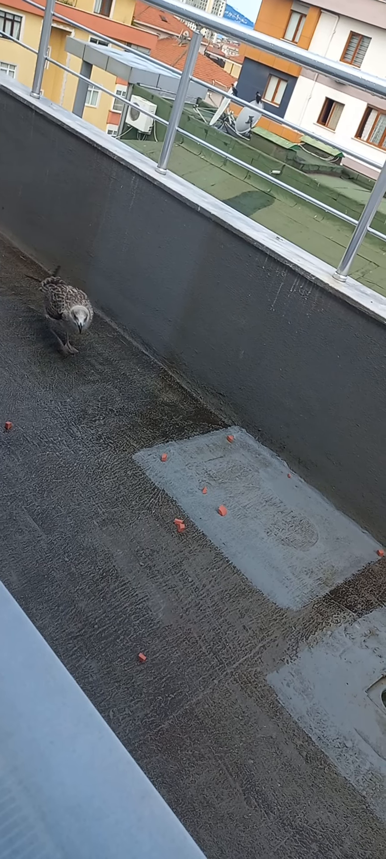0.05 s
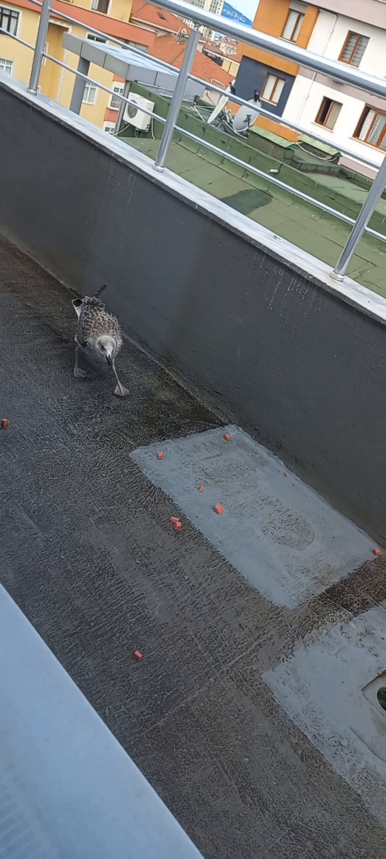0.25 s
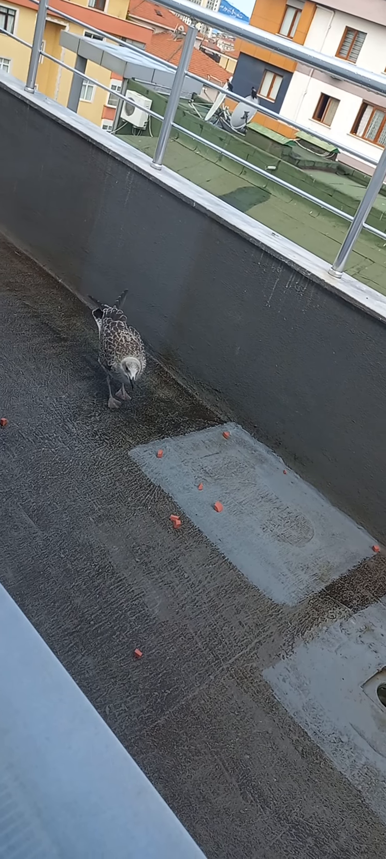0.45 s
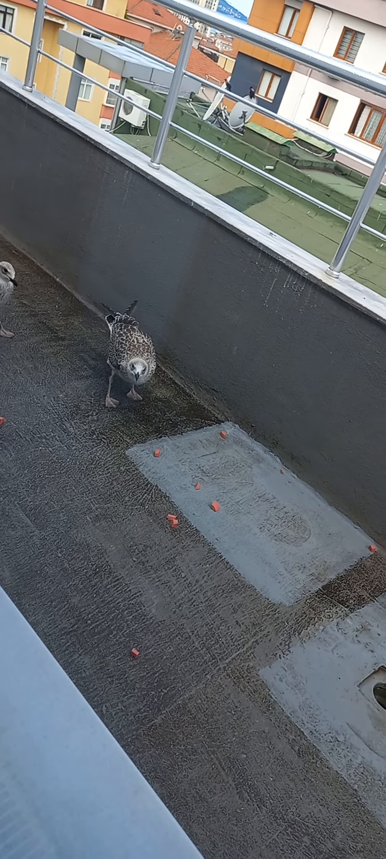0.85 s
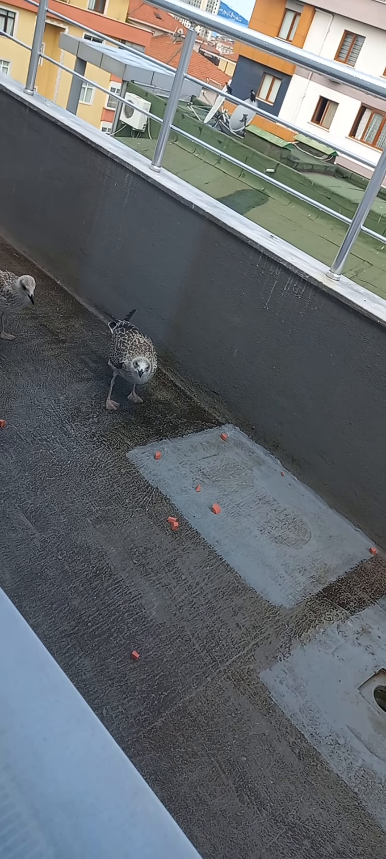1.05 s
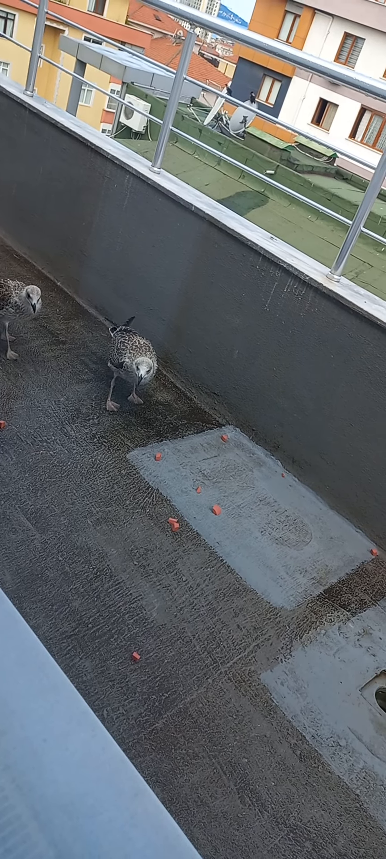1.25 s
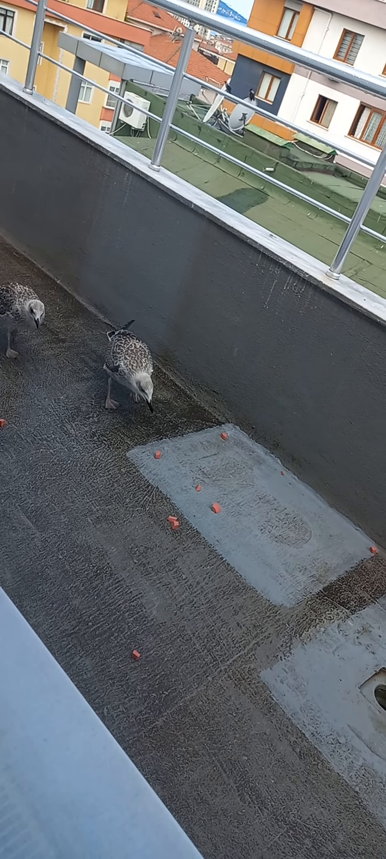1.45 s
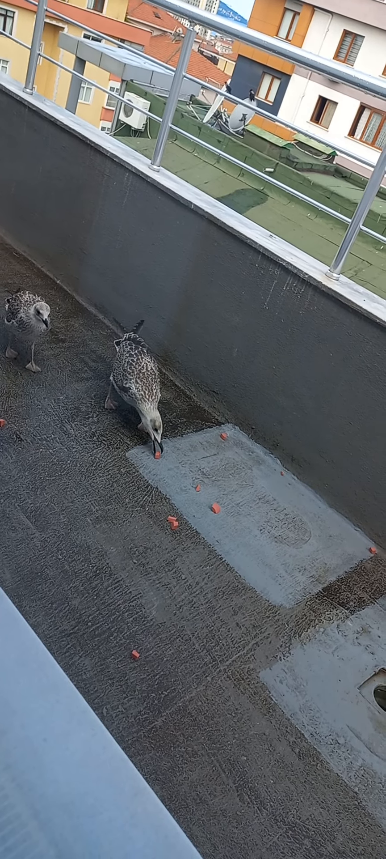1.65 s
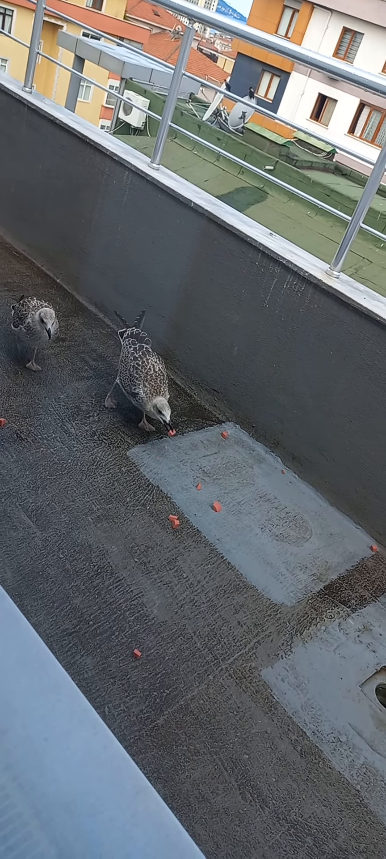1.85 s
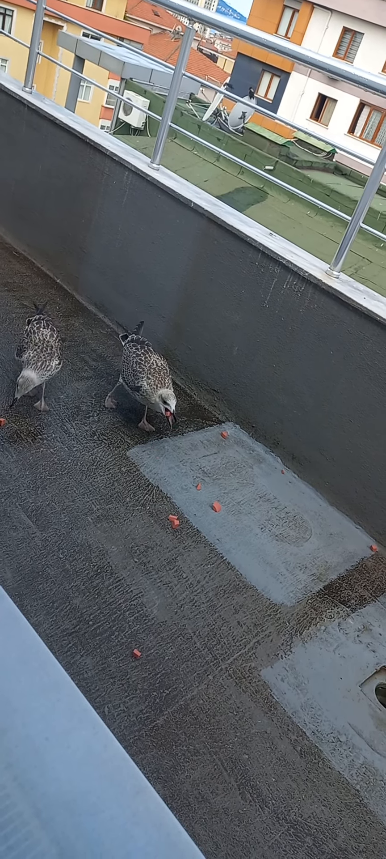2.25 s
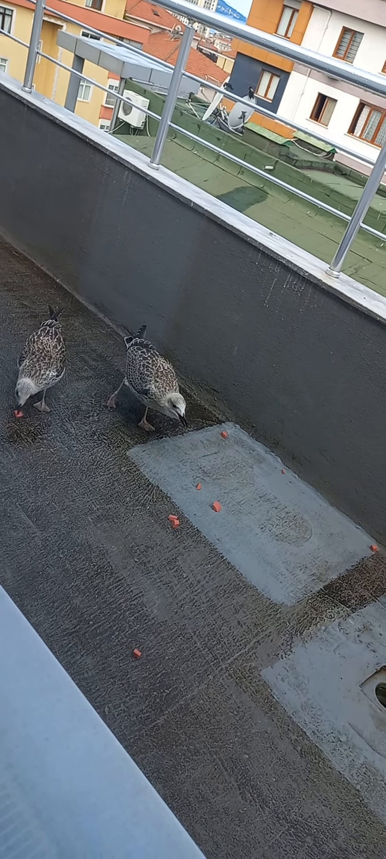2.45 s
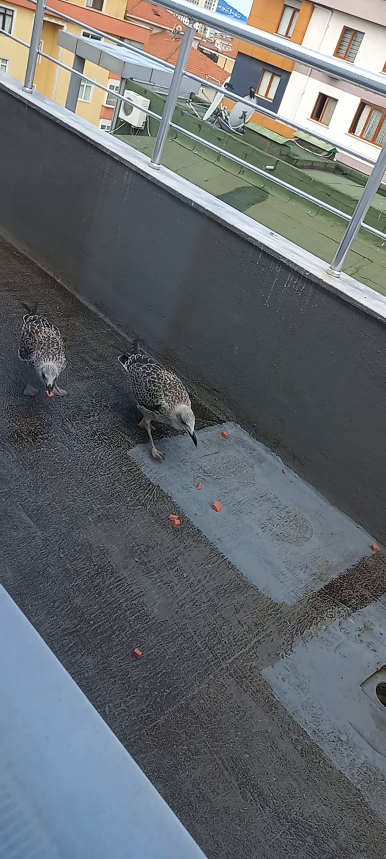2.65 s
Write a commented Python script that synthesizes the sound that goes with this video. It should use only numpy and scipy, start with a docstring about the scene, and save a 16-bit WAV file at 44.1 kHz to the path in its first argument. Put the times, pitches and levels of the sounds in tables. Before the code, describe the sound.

Young gulls beg with thin, high whistles that hold, then fall and roughen, each edged by short hoarse squeaks. The first comes at about 0.2 seconds, two overlap from 1.1 to 1.5, and another starts near 2 seconds, breaking into squeaks until 2.5. The terrace walls add a short echo. Light scuffs and soft rustling sound close by, over low wind rumble and faint town hiss.

```python
"""Two young gulls beg on a walled roof terrace: three bouts of thin whistles that hold, then fall,
each led in or broken off by short hoarse squeaks; the later calls overlap. Each note is a syrinx tone
with three overtones, roughened by jitter, shimmer and rasp. Floor and walls echo the calls.
Light scuffs and a soft rustle sound close by; behind are low wind, town hiss and a faint far squeal."""
import sys
import numpy as np
from scipy import signal
from scipy.fft import rfft, irfft, next_fast_len
from scipy.io import wavfile
from scipy.ndimage import map_coordinates

SR = 44100
rng = np.random.default_rng(int(sys.argv[2]) if len(sys.argv) > 2 else 0)


def file_out(sig):
    """Save sig as 16-bit WAV at sys.argv[1]."""
    # one column per channel
    cols = np.atleast_2d(sig).T
    # limit, then scale
    lim = np.clip(cols, -1, 1)
    pcm = np.round(lim * 32767).astype(np.int16)
    wavfile.write(sys.argv[1], SR, pcm)


N = 123479

# spectrum of scuffs and rustle: (frequency [Hz], level [dB])
GRIT_SPECTRUM = [(500, -16.5), (1400, 3), (2300, -0.5), (3500, -0.5), (6000, 0), (9000, -4.5), (12000, 1),
                 (15500, -4)]


def whistles(fall_roughness=0.94):
    """Long begging notes: cleanest at the top, rougher as the pitch falls."""
    # one whistle each: (time [s], pitch [Hz], level [dB])
    first = [(.195, 4070, -65.5), (.216, 4085, -34), (.26, 4092, -38.5), (.33, 4108, -30),
             (.365, 4105, -33.5), (.39, 4020, -37), (.42, 3933, -39.5), (.465, 3896, -49.5),
             (.482, 3818, -37.5), (.507, 3768, -38), (.525, 3754, -60)]
    second = [(1.152, 3830, -52), (1.168, 3854, -43), (1.19, 4012, -28), (1.215, 4008, -38.5),
              (1.265, 4087, -37.5), (1.29, 4108, -40.5), (1.34, 3992, -31.5), (1.39, 3940, -37.5),
              (1.44, 3860, -36.5), (1.49, 3690, -37.5), (1.515, 3643, -43), (1.53, 3600, -37)]
    second_upper = [(1.17, 4385, -63), (1.22, 4460, -52.5), (1.245, 4348, -37), (1.29, 4280, -32.5),
                    (1.34, 4246, -37.5), (1.39, 4160, -36.5), (1.44, 4102, -34.5), (1.48, 4050, -51)]
    third = [(2.062, 4530, -59), (2.072, 4588, -31.5), (2.11, 4548, -32), (2.142, 4534, -43.5),
             (2.154, 4512, -37.5), (2.195, 4560, -31), (2.23, 4520, -40.5), (2.255, 4426, -37),
             (2.28, 4385, -37), (2.305, 4150, -46.5), (2.32, 4100, -60)]
    # (curve, 2nd harmonic [dB], 3rd harmonic [dB], roughness [-], left-right [dB], left lag [s])
    notes = [(first, -20.5, -17, .016, -5, .0002293),
             (second, -23.5, -19, .02, -3.5, .00027),
             (second_upper, -26, -22, .02, -2.5, .00026),
             (third, -10.5, -14, .025, 0, .000245)]
    out = np.zeros((2, N))
    for curve, second_db, third_db, top_roughness, pan_db, lag_s in notes:
        hz, gain = contour(curve)
        roughness = top_roughness + fall_roughness * (1 - hz / hz.max())
        out += syrinx(hz, gain, second_db, third_db, roughness, pan_db, lag_s)
    return out


def squeaks(attack_s=0.013, release_s=0.014):
    """Short sliding notes where the voice catches or breaks."""
    # (onset [s], length [s], start pitch [Hz], end pitch [Hz], level [dB],
    #  2nd harmonic [dB], 3rd harmonic [dB], roughness [-])
    notes = [ (-.02, 0.049, 3806, 3696, -52.5, -17, -24, 0.41), (.125, .028, 3580, 3305, -49, 4, -2.5, .2),
             (0.155, 0.039, 3398, 3360, -49.5, -20, -17, 0.55),
             (.48, 0.04, 3600, 3435, -55.5, -21, -23, 0.73),
             (1.078, .045, 3405, 3158, -46.5, -14, -43, .35), (1.099, 0.024, 4180, 4005, -46, -6, -5, .25),
             (1.123, 0.049, 3306, 3254, -44, -20.5, -34, 0.47),
             (1.19, 0.069, 4590, 4780, -58.5, -11, -19.5, 1.1),
             (1.425, 0.08, 3642, 3485, -43.5, -20, -28, 0.06),
             (1.482, 0.038, 3447, 3251, -38.5, -13, -33, .25),
             (1.95, 0.0323, 3780, 3415, -45, -2.5, -5, 0.33),
             (1.973, 0.0427, 3568, 3243, -45.5, -12.5, -24, 0.58),
             (2.017, 0.073, 3960, 4028, -42, -25, -12, 0.13),
             (2.293, 0.06, 3300, 3260, -44, -11.5, -22.5, 0.33),
             (2.331, .05, 3700, 3607, -34, -10.5, -22.5, .2),
             (2.345, 0.047, 1725, 1900, -58, -20, -38, 0.17),
             (2.388, 0.051, 4160, 3920, -45, -8, -25, 0.24),
             (2.439, 0.043, 3950, 4180, -47.5, -2.5, -22, 0.4),
             (2.463, 0.031, 3427, 3320, -36.5, -20.5, -28, 0.37),
             (2.479, 0.03, 2416, 2258, -38.5, -19, -33, 0.35),
             (2.482, 0.0283, 1557, 1318, -49.5, -38, -28, 0.4)]
    t, out = clock(), np.zeros((2, N))
    for onset_s, length_s, start_hz, end_hz, db, second_db, third_db, roughness in notes:
        end_s = onset_s + length_s
        gate = np.clip((t - onset_s) / attack_s, 0, 1) * np.clip((end_s - t) / release_s, 0, 1)
        hz = np.interp(t, [onset_s, end_s], [start_hz, end_hz])
        out += syrinx(hz, amp(db) * gate, second_db, third_db, roughness, pan_db=-3, lag_s=0.0002755)
    return out


def syrinx(hz, gain, second_db, third_db, roughness, pan_db, lag_s):
    """Four-harmonic voice in stereo; roughness shakes pitch and level and adds a rasp."""
    on = np.flatnonzero(gain > 0)
    t, roughness = on / SR, np.broadcast_to(roughness, N)[on]
    waver = .0015 * wobble(t, rate_hz=70)
    jitter = roughness * .035 * wobble(t, rate_hz=600)
    hz = hz[on] * (1 + waver + jitter)
    phase = 2 * np.pi * (np.cumsum(hz) / SR - np.outer([lag_s, 0], hz))
    tone = 0
    for k, level in enumerate(amp([0, second_db, third_db, third_db - 8]), 1):
        rasp = 1 + roughness * 0.15 * wobble(t, rate_hz=1200)
        tone += level * np.sin(k * phase) * rasp
    shimmer_db = roughness * 8.5 * wobble(t, rate_hz=600)
    pan = amp([[pan_db / 2], [-pan_db / 2]])
    out = np.zeros((2, N))
    out[:, on] = np.sqrt(2) * tone * gain[on] * amp(shimmer_db) * pan
    return out


def throat(voice):
    """The throat colours the voice with two notches."""
    # (frequency [Hz], gain [dB])
    response = [(1300, -0.5), (2550, 0.5), (2850, -22), (3200, -0.5), (4800, -1.5), (5300, -15),
                (6500, 0.5), (15000, -4.5)]
    return filtered(voice, lambda hz: amp(along(response, hz)))


def terrace(x, tail_delay_s=.01, tail_db=-3.5):
    """Direct sound, floor and wall echoes, and a short diffuse tail."""
    # echoes: (left delay [s], right delay [s], left gain [dB], right gain [dB])
    walls = [(.0031, .0034, -7.5, -16), (0.0124, 0.0078, -10.5, -17), (0.0265, 0.015, -10.5, -5.5)]
    # tail decay: (frequency [Hz], T60 [s])
    tail_t60 = [(1500, 0.34), (2400, 0.27), (3400, 0.32), (4500, 0.31), (8000, 0.32), (14000, 0.17)]

    def path(hz, left_s, right_s, left_db, right_db):
        return amp([[left_db], [right_db]]) * np.exp(-2j * np.pi * np.outer([left_s, right_s], hz))

    early = filtered(x, lambda hz: 1 + sum(path(hz, *wall) for wall in walls))
    band_hz, t, spectra = signal.stft(rng.standard_normal((2, SR // 2)), SR, nperseg=256)
    decay = amp(-60 * t / along(tail_t60, band_hz)[:, None])
    tail = signal.istft(spectra * decay, SR, nperseg=256)[1]
    diffuse = signal.fftconvolve(x[1:], tail / np.linalg.norm(tail[0]), axes=1)[:, :N]
    return early + filtered(diffuse, lambda hz: path(hz, tail_delay_s, tail_delay_s, tail_db, tail_db))


def scuffs(rise_s=.002, fall_s=0.013):
    """Brief noise bursts, probably the birds' feet on the gritty floor."""
    # (onset [s], level [dB])
    bursts = [(.378, -48.5), (.486, -50), (.955, -52), (1.416, -56.5), (2.56, -61)]
    envelope = np.zeros(N)
    for onset_s, db in bursts:
        age_s = np.maximum(clock() - onset_s, 0)
        envelope += amp(db) * (1 - np.exp(-age_s / rise_s)) * np.exp(-age_s / fall_s)
    return envelope * noise(GRIT_SPECTRUM, coherence=[(1000, 0.092)])


def rustle(grain_db=2.0, grain_rate_hz=220):
    """Soft grainy swishes close by."""
    # (time [s], level [dB])
    swishes = [(0, -76), (0.099, -69), (.22, -55.5), (.31, -62.5), (.385, -53.5), (.44, -58.5), (.5, -58.5),
               (.61, -74.5), (.68, -63), (.73, -69.5), (.82, -58), (0.891, -66.5), (.96, -57), (1.05, -71),
               (1.23, -64.5), (1.33, -67), (1.52, -62), (1.72, -80), (1.92, -80.5), (2.0, -67),
               (2.2, -62.5), (2.42, -73.5), (2.5, -58.5), (2.58, -61.5), (2.65, -68), (2.8, -73)]
    level_db = np.interp(clock(), *np.transpose(swishes))
    grain = amp(grain_db * wobble(clock(), grain_rate_hz))
    return amp(level_db) * unit(grain * noise(GRIT_SPECTRUM, coherence=[(1000, 0.064)]))


def wind(hiss_db=-74.5):
    """Low buffeting and a broader rumble, over the steady hiss of a distant town."""
    # (time [s], buffet level [dB], rumble level [dB])
    gusts = [(0.0, -69, -56.5), (0.11, -68.5, -58), (0.21, -51, -52), (0.28, -60, -53), (0.99, -60, -58.5),
             (1.06, -67, -61), (1.17, -50.5, -52), (1.28, -67.5, -53), (1.32, -49.5, -55),
             (1.43, -67.5, -53.5), (2.24, -56, -55), (2.28, -68, -54), (2.47, -50.5, -54.5),
             (2.53, -64, -56.5), (2.7, -55.5, -59), (2.73, -67, -54.5), (2.77, -55, -58), (2.8, -68, -54.5)]
    # spectra: (frequency [Hz], level [dB])
    buffet_spectrum = [(25, -42), (40, -26), (52, -11), (72, -14), (100, 3.5), (125, 0), (160, -21.5),
                       (400, -55)]
    rumble_spectrum = [(60, -35), (110, -17), (138, 0.5), (167, -5), (200, -0.5), (250, -2.5), (370, -10),
                       (540, -9.5), (800, -26.5), (1100, -33), (2400, -79.5)]
    hiss_spectrum = [(300, 6), (900, 4.5), (1500, 3), (2500, -12.5), (4000, -9.5), (8000, -11),
                     (15000, -23)]
    # (frequency [Hz], left-right coherence [0-1])
    coherence = [(60, .94), (150, 0.92), (300, 0.9), (600, 0.27), (1000, 0.2)]
    time_s, buffet_db, rumble_db = np.transpose(gusts)
    buffet = amp(np.interp(clock(), time_s, buffet_db)) * noise(buffet_spectrum, coherence)
    rumble = amp(np.interp(clock(), time_s, rumble_db)) * noise(rumble_spectrum, coherence)
    hiss = amp(hiss_db) * noise(hiss_spectrum, coherence=[(1000, 0.085)])
    return buffet + rumble + hiss


def squeals():
    """Faint thin sine tones from far off."""
    # one curve per tone: (time [s], pitch [Hz], level [dB])
    curves = [
        [(.83, 2100, -75), (.91, 2147, -74), (.97, 2190, -75)],
        [(.95, 1970, -82), (.99, 1965, -69.5), (1.07, 1955, -76), (1.14, 1965, -71), (1.21, 1957, -70),
         (1.24, 1910, -87)],
    ]
    return sum(gain * np.sin(2 * np.pi * np.cumsum(hz) / SR) for hz, gain in map(contour, curves))


def contour(curve, fade_s=.004):
    """Pitch and gain per sample; silent outside the curve."""
    time_s, hz, db = np.transpose(curve)
    t = clock()
    gate = np.clip(np.minimum(t - time_s[0], time_s[-1] - t) / fade_s, 0, 1)
    return np.interp(t, time_s, hz), amp(np.interp(t, time_s, db)) * gate


def noise(spectrum, coherence):
    """Coloured stereo noise of rms 1; coherence sets the mid/side split."""
    def response(hz):
        angle = np.arccos(np.clip(along(coherence, hz), -1, 1)) / 2
        return amp(along(spectrum, hz)) * [np.cos(angle), np.sin(angle)]

    mid, side = filtered(rng.standard_normal((2, N)), response)
    return unit(np.array([mid + side, mid - side]))


def filtered(x, response):
    """Apply a complex frequency response."""
    size = next_fast_len(N + SR // 2)
    return irfft(rfft(x, size) * response(np.fft.rfftfreq(size, 1 / SR)), size)[..., :N]


def wobble(t, rate_hz):
    """Smooth random curve with rate_hz knots a second."""
    return map_coordinates(rng.standard_normal(N // 16), [t * rate_hz], mode="mirror")


def along(points, hz):
    """Interpolate (frequency [Hz], value) points on a log axis."""
    knot_hz, values = np.transpose(points)
    return np.interp(np.log(hz + 1), np.log(knot_hz + 1), values)


def amp(db):
    return 10 ** (np.asarray(db) / 20)


def unit(x):
    return x / np.sqrt(np.mean(x ** 2) + 1e-20)


def clock():
    return np.arange(N) / SR


def scene():
    """Gulls on the terrace, in the wind."""
    gulls = throat(whistles() + squeaks())
    return terrace(gulls + squeals()) + wind() + rustle() + scuffs()


def record(dry):
    """Brick-wall low-pass."""
    cutoff_hz = 15800
    return filtered(dry, lambda hz: hz < cutoff_hz)


dry = scene()
out = record(dry)
file_out(out)
```